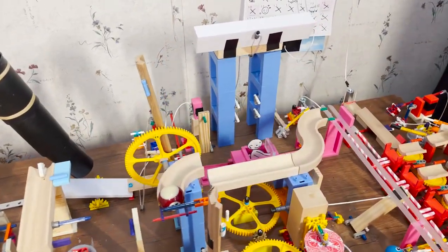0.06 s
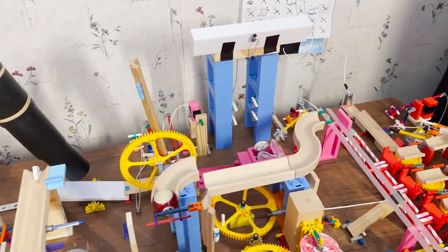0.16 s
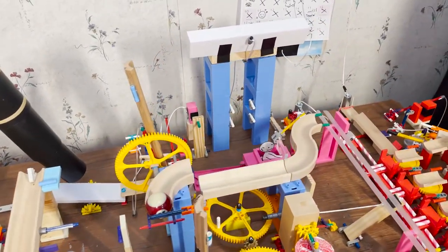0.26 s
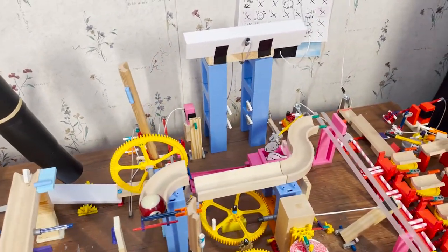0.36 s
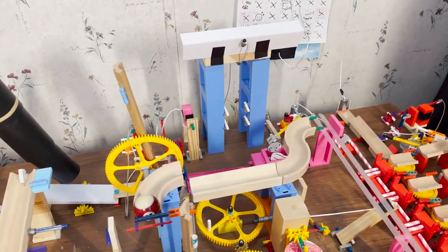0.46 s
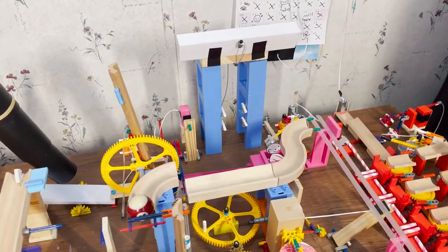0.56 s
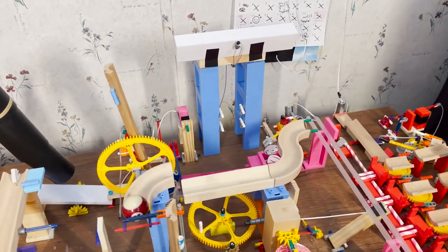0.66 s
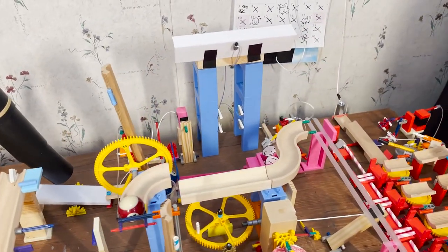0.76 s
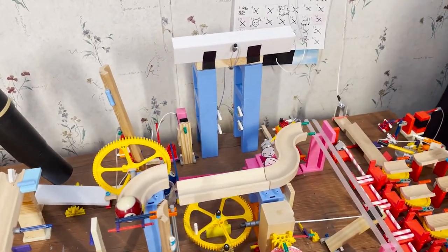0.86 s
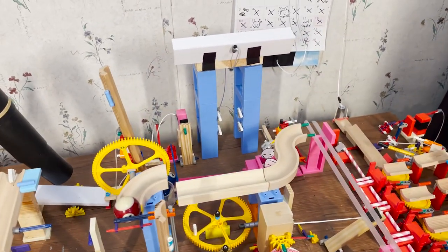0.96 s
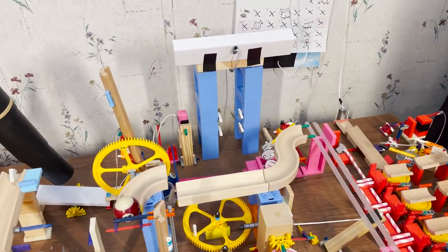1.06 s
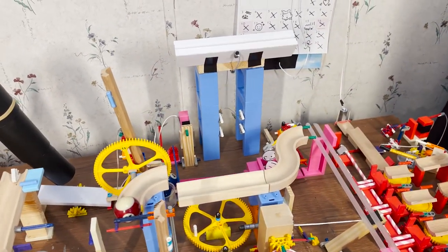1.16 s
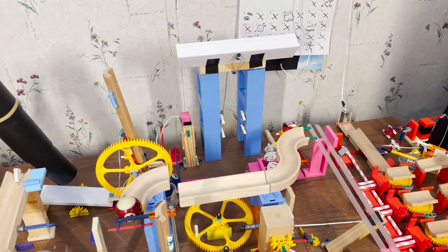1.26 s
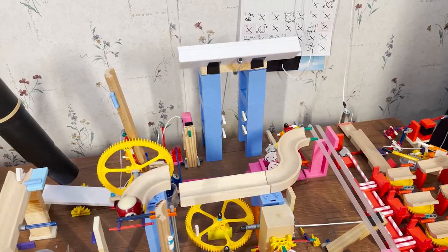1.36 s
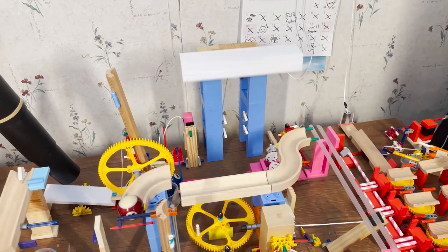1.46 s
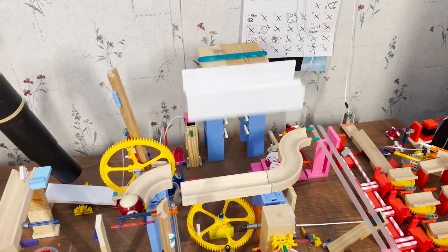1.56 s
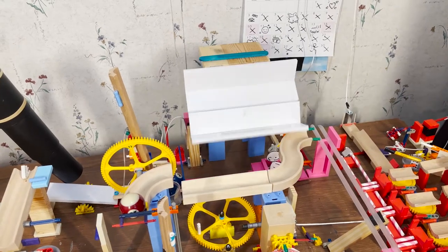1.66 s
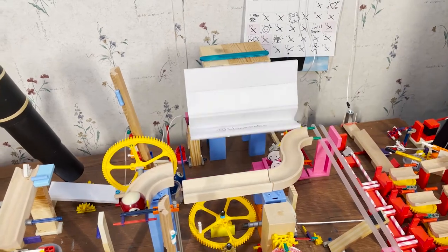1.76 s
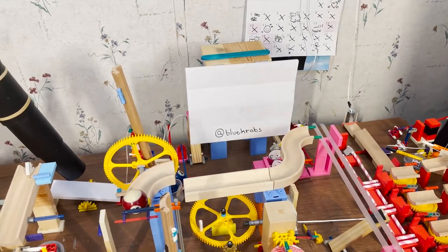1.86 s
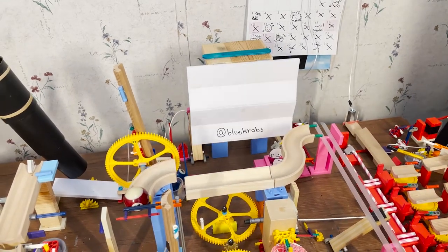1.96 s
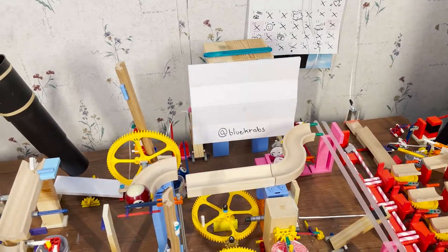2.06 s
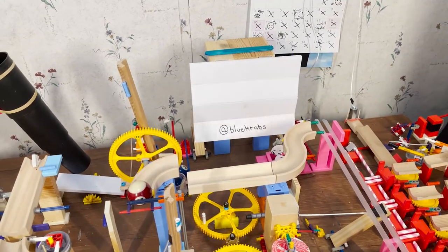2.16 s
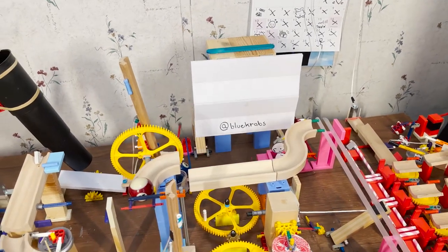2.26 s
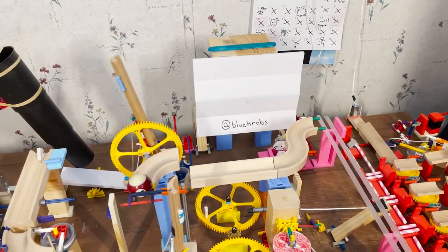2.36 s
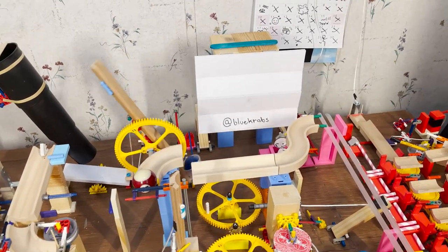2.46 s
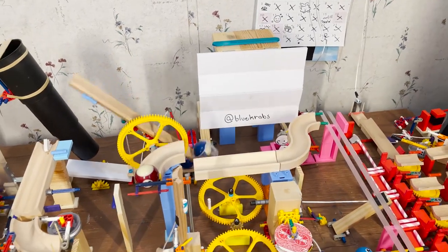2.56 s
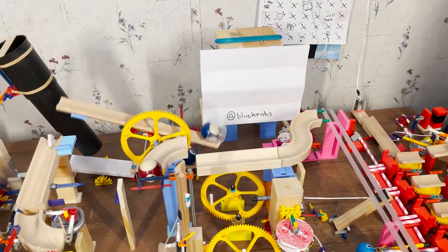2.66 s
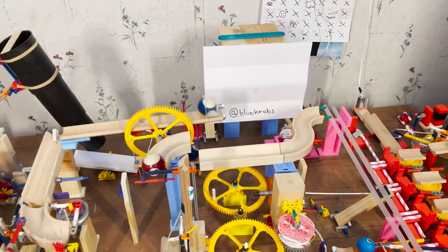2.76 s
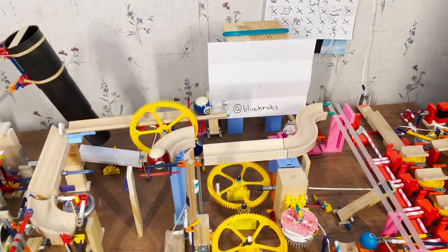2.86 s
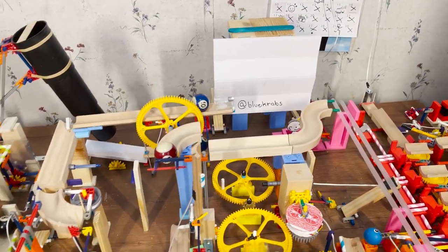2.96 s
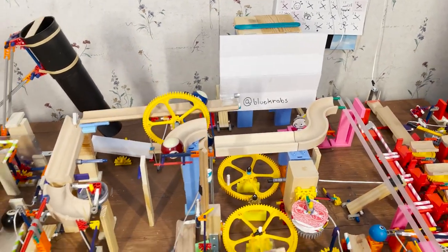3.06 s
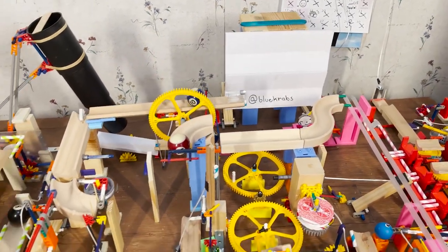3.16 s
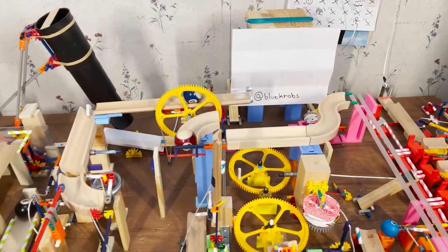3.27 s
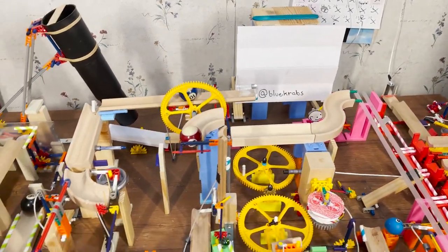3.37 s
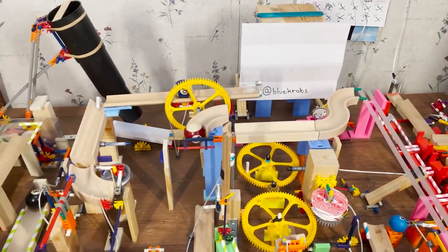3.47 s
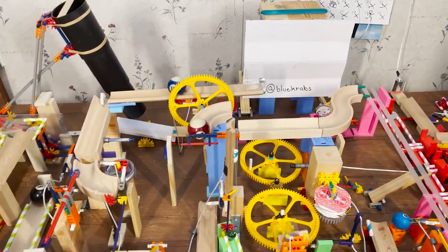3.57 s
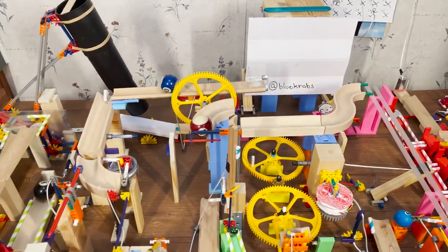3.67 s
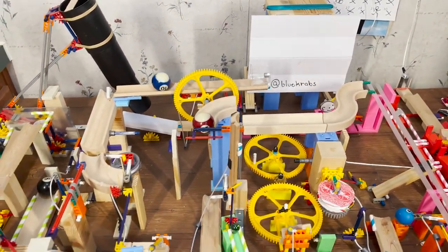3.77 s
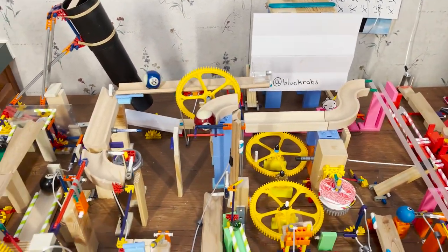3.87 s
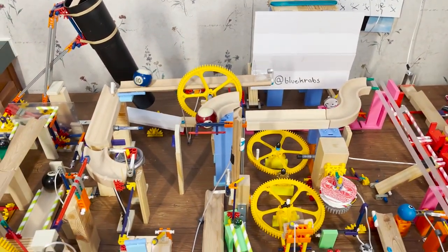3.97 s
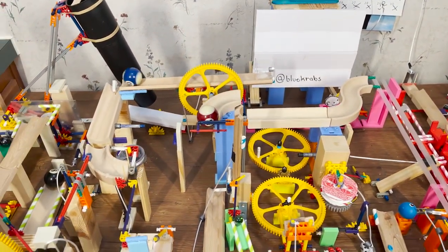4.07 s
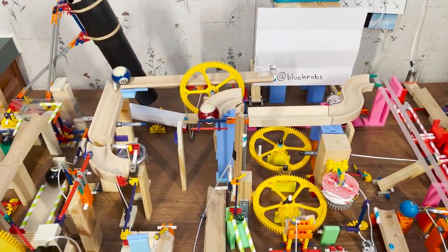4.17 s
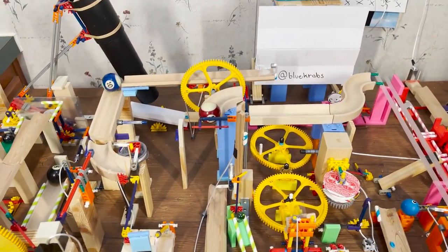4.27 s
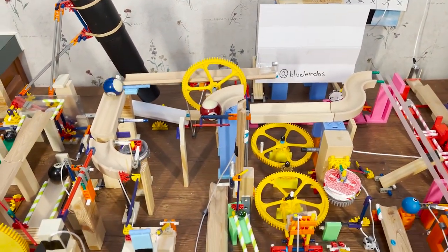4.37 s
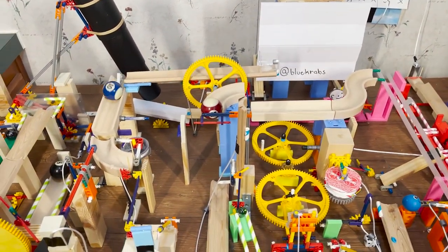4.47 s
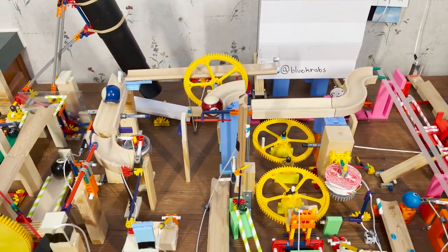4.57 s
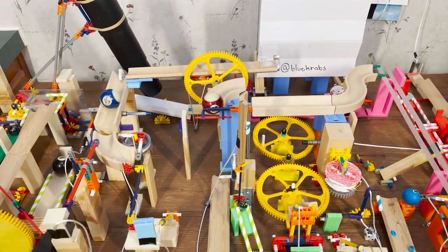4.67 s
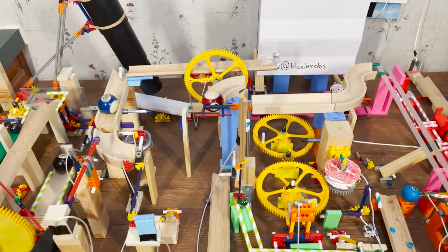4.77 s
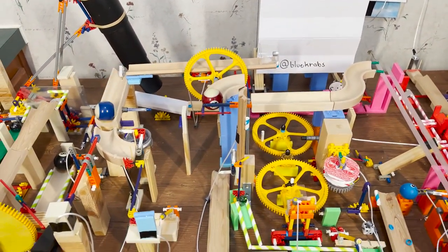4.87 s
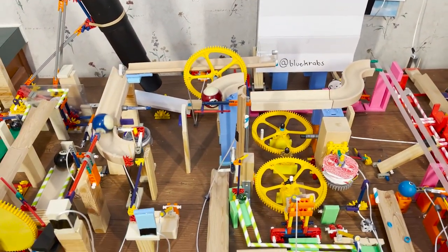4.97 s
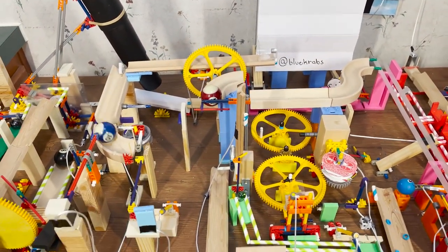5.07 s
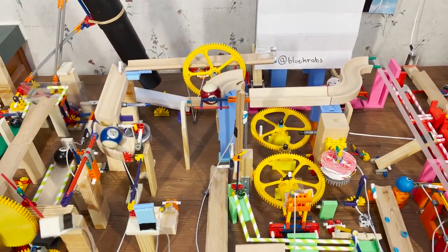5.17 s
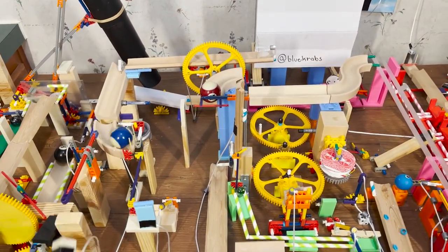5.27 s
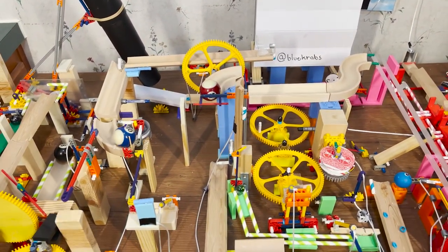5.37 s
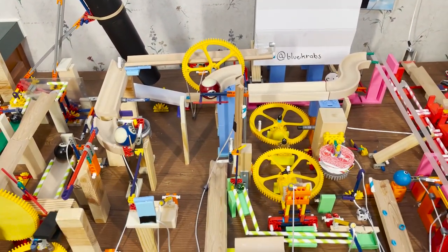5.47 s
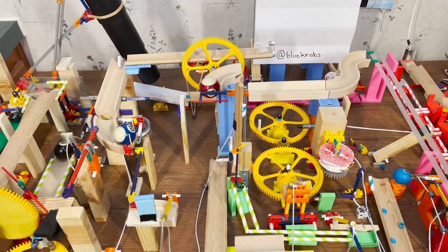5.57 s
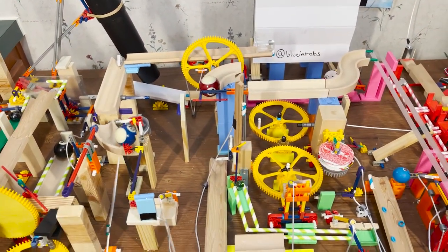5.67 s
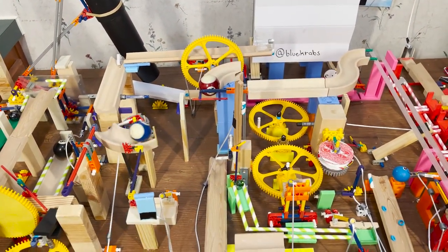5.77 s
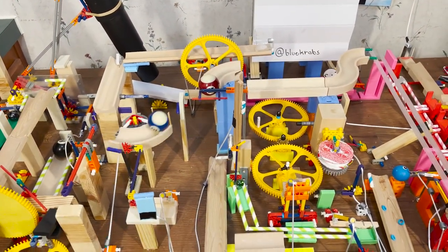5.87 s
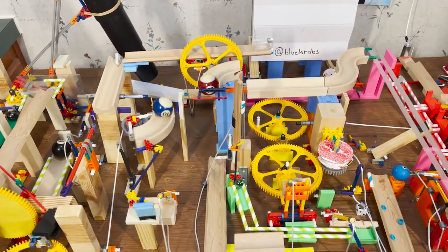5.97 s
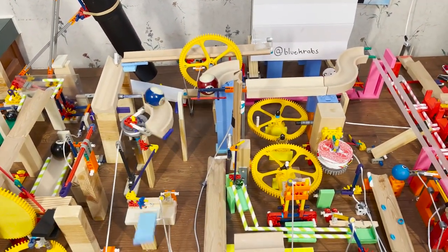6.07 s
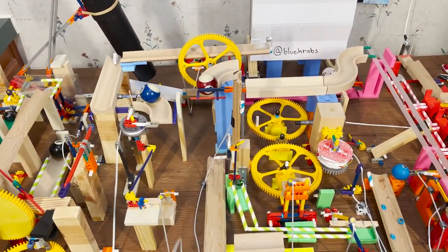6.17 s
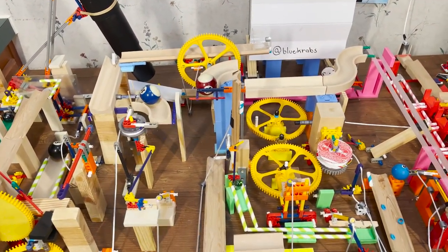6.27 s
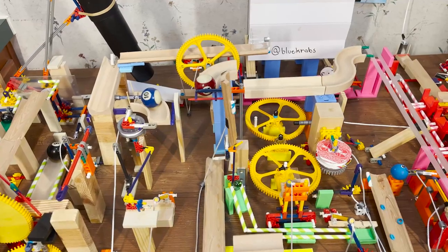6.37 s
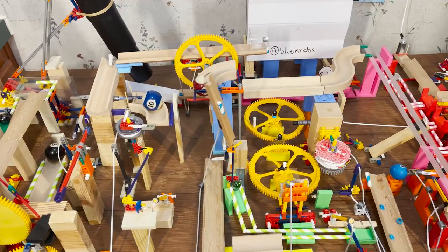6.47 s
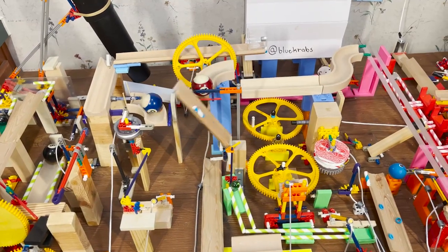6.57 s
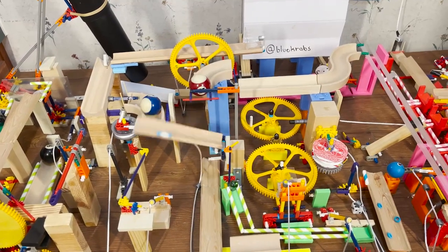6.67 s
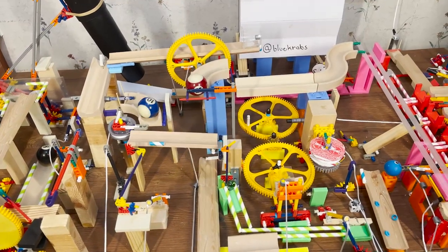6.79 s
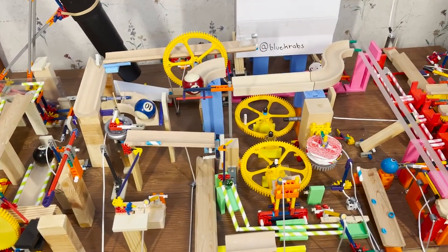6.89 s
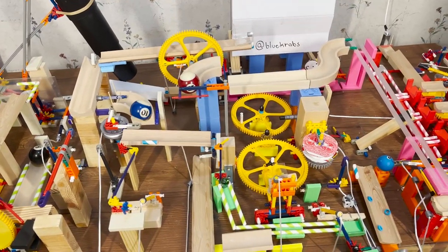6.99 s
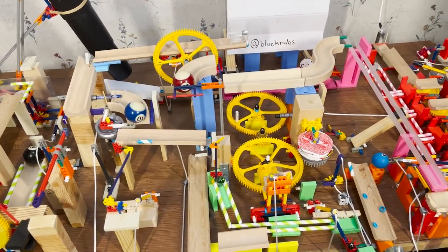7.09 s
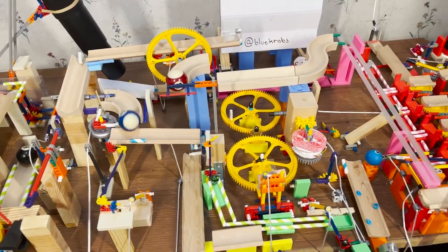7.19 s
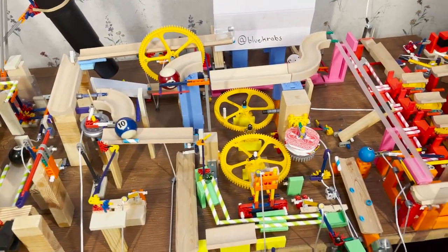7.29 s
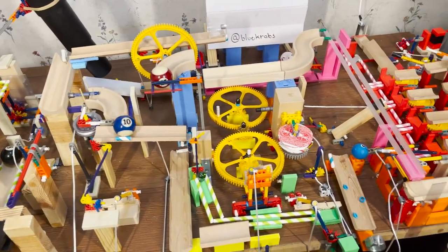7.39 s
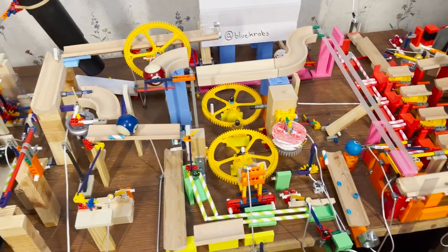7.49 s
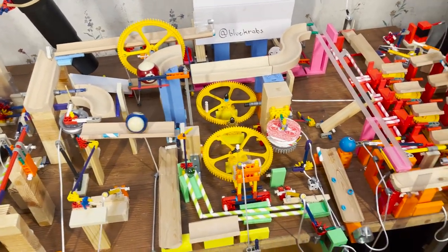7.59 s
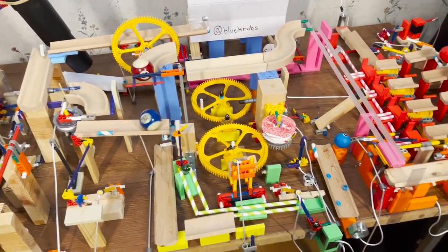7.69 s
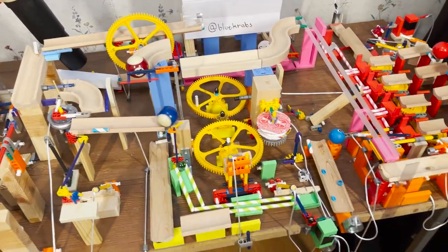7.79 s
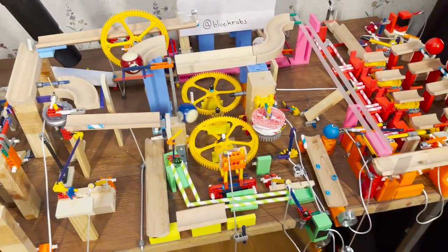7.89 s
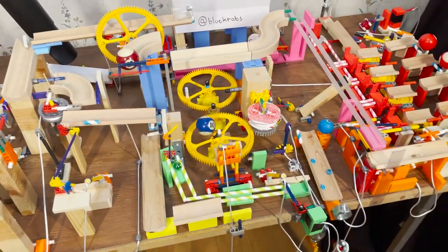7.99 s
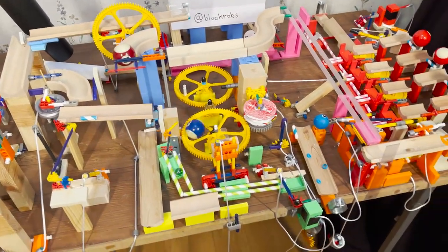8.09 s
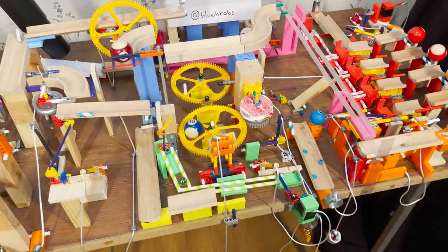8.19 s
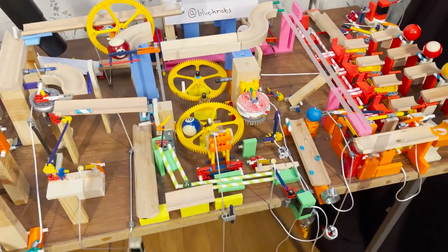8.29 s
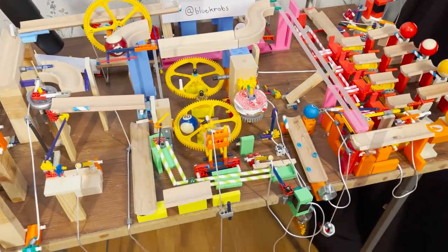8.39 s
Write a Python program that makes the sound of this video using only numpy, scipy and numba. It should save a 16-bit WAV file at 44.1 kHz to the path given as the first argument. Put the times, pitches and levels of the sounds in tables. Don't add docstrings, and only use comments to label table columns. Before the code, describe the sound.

Heavy balls roll along wooden tracks on a tabletop, tripping levers and blocks with sharp clacks, rattles, paper rustle and low thumps.

```python
import sys
import numpy as np
from scipy import signal
from scipy.fft import rfft, irfft, next_fast_len
from scipy.io import wavfile
from scipy.ndimage import uniform_filter1d
from numba import njit

SR = 44100
rng = np.random.default_rng(int(sys.argv[2]) if len(sys.argv) > 2 else 0)


def boost(x):
    u = np.asarray(x, float) / 20
    return 10 ** u


def dump_mix(stems):
    frames = np.atleast_2d(stems).T
    limited = np.clip(frames, -1, 1)
    pcm = np.round(limited * 32767).astype(np.int16)
    wavfile.write(sys.argv[1], SR, pcm)


N = 372204


def band(x, lo_hz, hi_hz):
    y = signal.sosfilt(signal.butter(2, [lo_hz, hi_hz], "band", fs=SR, output="sos"), x)
    return y / np.sqrt(np.mean(y ** 2))


def walk(rate):
    k = int(SR / rate)
    steps = np.repeat(rng.standard_normal(N // k + 1), k)
    return 1.2 * uniform_filter1d(uniform_filter1d(steps, k), k)[:N]


def swell(s, length_s, db, rise_s, t60):
    drive = np.zeros(N + 1)
    np.add.at(drive, np.clip(s * SR, 0, N).astype(int), boost(db) ** 2)
    np.add.at(drive, np.clip((s + length_s) * SR, 0, N).astype(int), -boost(db) ** 2)
    power = np.cumsum(drive[:N])
    fall = np.exp(-2 * np.log(1000) / t60 / SR)
    for pole in np.exp(-1 / (rise_s * SR)), fall:
        power = signal.lfilter([1 - pole], [1, -pole], power)
    return np.maximum(power, 0)


@njit
def ring(place, start, length, swing, turn, fall, places, n):
    out = np.zeros((places, n))
    for k in range(len(start)):
        z, push = swing[k], 1.
        for i in range(start[k], min(n, start[k] + length[k])):
            push *= fall[k]
            z *= turn[k]
            out[place[k], i] += z.imag * (1 - push)
    return out


def strike(s, hz, db, t60, rise, phase, count=3):
    place = np.arange(len(hz))[:, None] % count + 0 * hz.astype(np.int64)
    start = (s * SR).astype(np.int64)
    length = (t60 * SR).astype(np.int64)
    swing = boost(db) * np.exp(2j * np.pi * phase)
    turn = np.exp((2j * np.pi * hz - np.log(1000) / t60) / SR)
    fall = np.exp(-1 / (rise * SR))
    modes = place, start, length, swing, turn, fall
    return ring(*(v.ravel() for v in modes), count, N)


def blows():
    # (time [s], blow level [dB], table thump re blow [dB], hardness [dB]: tick up, clack down)
    clicks = [(0.233, -65.5, -3, -5), (0.316, -80.5, 2, -13), (0.382, -52.5, -13, -3), (0.4, -55.5, -4, -4),
              (0.496, -32.5, -10, -2), (1.029, -52.5, -7, -2), (1.227, -39, -14, 0),
              (1.616, -13, -16, -1.5), (1.848, -23.5, -2.5, -1.5), (1.896, -25.5, -7, 0.5),
              (2.25, -53, -9, -11), (2.73, -38.5, -14.5, 2), (2.893, -39, -8, -0.5),
              (2.977, -54.5, 10.5, -12.5), (3.298, -54, 6.5, 8.5), (4.411, -43, 12, -11),
              (5.073, -35.5, -17, 6), (5.313, -43, -10, -6.5), (5.7, -50.5, 0, -7), (5.909, -45, -14, 3),
              (5.955, -56.5, -10, -4), (6.177, -28, -24.5, 1.5), (6.72, -16, -14, 2.5),
              (7.189, -36.5, -15.5, -1), (7.251, -25, -11, 3.5), (8.066, -33.5, -11, 15),
              (8.333, -51.5, -5.5, -3.5), (8.353, -63.5, -6, -5)]
    clacks = [(1.088, -70, -5, 1), (1.14, -47.5, 9.5, -4.5), (1.859, -20, -25.5, 2.5), (2.256, -49, 0, -4),
              (2.578, -48.5, 9.5, -5.5), (2.592, -48, -4, -7), (2.604, -48.5, 4, -8.5),
              (3.032, -65, 17.5, -10), (3.746, -64, -3.5, 1.5), (4.243, -54, 12, 0),
              (4.29, -25.5, -2, -7.5), (5.273, -53, 1.5, -5), (5.329, -44, -12, -1.5), (5.348, -28, -16, 8),
              (5.364, -34, 1, 6.5), (5.628, -47.5, -4.5, 13), (5.883, -60, -8, 11.5),
              (6.105, -55, -15.5, 0.5), (6.117, -36.5, -12, 5), (6.193, -38.5, -9.5, 0.5),
              (6.713, -27, -13, 5), (7.231, -44, -10.5, -9.5), (7.32, -39, -14, -3.5),
              (7.835, -23, -2, -10), (7.875, -36.5, 2.5, -12.5), (8.122, -34.5, -15.5, 11.5),
              (8.273, -42, -5, -2.5)]
    raps = [(0.935, -55, -5, -3), (0.962, -43, -6, 2.5), (1.12, -65.5, 11.5, 9), (1.499, -70, -7, -3),
            (1.524, -62, 1, 3), (1.565, -36, 2.5, -6), (1.644, -22, -4.5, 2), (2.265, -40.5, 0, -2),
            (2.418, -61, 5, 1), (2.764, -25, -2.5, 3), (2.859, -48, 10.5, -5), (3.34, -69.5, 11.5, -5.5),
            (3.501, -80, 7, -8.5), (4.06, -75, 22.5, -4.5), (4.189, -78, 25.5, -10), (4.971, -40.5, -2, 0),
            (4.982, -42, 3, -1.5), (5.16, -65, 16, -16), (5.675, -45, 1, -0.5), (5.823, -64, 3.5, -0.5),
            (6.019, -57.5, -14, 1), (6.392, -60.5, 6, -5), (7.519, -48, 0, -6), (7.994, -24.5, -9, 10),
            (8.139, -38.5, -12, 7), (8.167, -34, -13, 10)]
    taps = [(0.064, -77.5, 14.5, -2), (0.435, -73.5, -4, -11), (1.821, -28.5, -2, 4.5),
            (2.061, -37, -0.5, -5.5), (2.311, -55.5, 4.5, -4), (2.345, -54.5, -14, 8.5),
            (2.356, -52.5, -3, 6), (2.467, -71, -11, -5), (2.489, -60, 1, 5), (3.27, -78, 21, -7),
            (3.772, -78.5, 9.5, 1.5), (4.314, -44.5, 3, -12.5), (4.777, -81, 27.5, -14.5),
            (4.871, -83.5, 32.5, -15.5), (5.232, -67, 7, -7), (5.395, -36.5, 4, 5.5), (5.552, -64.5, 0, 5),
            (5.575, -61.5, 7, -2), (5.837, -65.5, 7, -12), (7.584, -75, 12, -8.5), (7.75, -71, 8.5, -5.5),
            (7.907, -48, -20, 1), (1.558, -50, 0, -8), (1.817, -46, -8, 4), (5.342, -47, 0, 2),
            (7.828, -55, 5, -8), (7.983, -57, -10, 10), (8.305, -66, -5, 6), (8.315, -62, -5, 6),
            (6.432, -78, -10, 6), (7.173, -76, 15, -10), (5.407, -40, 2, 4), (5.657, -58, 0, 0),
            (2.278, -48, 0, 0), (1.675, -36, -5, 0)]
    bite_db = [7.5, 5.5, -0.5, -3]
    rows = []
    for table, bite in zip((clicks, clacks, raps, taps), bite_db):
        for s, db, thump, hard in table:
            edge = 1.5 * min(hard, 0) - 0.13 * bite
            rows.append((s, db, thump, -bite - hard, 0, edge, hard - bite))
    return np.array(sorted(rows))


def motion(jolt_s=0.031):
    # (time [s], rumble level [dB])
    roll_levels = [(0.0, -74), (0.45, -72), (0.8, -85), (1.2, -71), (1.5, -69.5), (2.4, -67), (3.1, -69),
                   (3.97, -67.5), (4.45, -51.5), (4.9, -53.5), (5.65, -59), (5.92, -80), (6.3, -59),
                   (6.58, -96), (7.3, -75), (7.649, -53), (7.8, -54), (8.44, -73)]
    # (time [s], level [dB])
    sways = [(0.149, -58.5), (0.26, -60.5), (0.505, -53.5), (0.965, -50), (1.15, -42), (1.34, -56),
             (1.62, -33), (1.84, -40.5), (2.07, -51.5), (2.33, -57), (2.765, -52), (3.1, -59.5),
             (3.31, -58), (3.62, -65), (4.1, -60), (4.29, -47.5), (4.5, -60.5), (4.985, -55.5),
             (5.36, -41.5), (5.57, -52), (5.87, -62), (6.129, -50), (6.34, -45.5), (6.72, -51),
             (7.255, -44), (7.529, -58), (7.84, -48.5), (8.01, -50), (8.17, -48.5)]
    # (start [s], end [s], scrape level [dB], hiss re scrape [dB])
    slides = [(0.0, .49, -72, -39), (0.965, 1.124, -71, -5), (1.445, 1.56, -78.5, 2),
              (1.654, 1.99, -54.5, -3.5), (2.06, 2.165, -67.5, -16.5), (2.296, 2.58, -66.5, -4),
              (2.6, 2.74, -62, -14), (3.922, 4.29, -76.5, -1), (4.303, 4.62, -75.5, 6),
              (5.1, 5.33, -88.5, -22.5), (5.44, 5.637, -64, -10), (5.71, 6.337, -77, -5),
              (6.82, 7.0, -64, -6), (7.0, 7.15, -76, -8), (7.3, 7.52, -77.5, -7), (7.556, 7.8, -68, -1),
              (7.907, 7.99, -60, -12.5), (7.978, 8.048, -42.5, -16), (8.063, 8.255, -60, -5),
              (8.261, 8.426, -78, -15)]
    # (shudder level [dB], scrape level [dB], hiss level [dB])
    still_db = [-79, -86, -88]
    roll = boost(np.interp(np.arange(N) / SR, *np.transpose(roll_levels))) ** 2
    s, blow_db, thump_db = blows().T[:3]
    shake = swell(s, jolt_s, blow_db + thump_db - 14, rise_s=0.0028, t60=0.45)
    s, db = np.transpose(sways)
    sway = swell(s, jolt_s, db + 5.5, rise_s=0.015, t60=0.32) + roll * boost(-17.5) ** 2
    s, end_s, scrape_db, hiss_db = np.transpose(slides)
    scrape = swell(s, end_s - s, scrape_db, rise_s=0.01, t60=0.13)
    hiss = swell(s, end_s - s, scrape_db + hiss_db, rise_s=0.01, t60=0.13)
    still = boost(still_db) ** 2
    return np.sqrt([sway + still[0], roll + shake, scrape + still[1], hiss + still[2]])


def rolling(grit_db=3.5):
    # (frequency [Hz], width [Hz], level [dB])
    track = [(125, 30, -14), (176, 16, -1), (232, 40, -12), (278, 45, -15), (390, 110, -15), (490, 60, -20),
             (700, 300, -23)]
    swaying, rumbling, scraping, hissing = motion()
    bumps = rng.standard_normal(N) * boost(walk(25))
    shudder = band(bumps, 32, 40) * boost(-9.5) + band(bumps, 50, 100)
    rumble = np.zeros(N)
    for hz, width, db in track:
        rumble += boost(db + 3.0 * walk(6)) * band(bumps, hz - width / 2, hz + width / 2)
    grit = rng.standard_normal((2, N)) * boost(grit_db * walk(130))
    scrape = band(grit[0], 670, 3500) * scraping * boost(walk(21))
    hiss = band(grit[1], 3100, 12000) * hissing * boost(1.3 * walk(14))
    return boost(-5.0) * (shudder * swaying + rumble * rumbling + scrape + hiss)


def crackle():
    # (time [s], length [s], level [dB])
    crackles = [(0.959, .003, -55), (1.614, .012, -40), (1.71, .05, -58), (1.835, .05, -46),
                (1.858, .006, -37), (1.9, .035, -56), (2.063, .05, -53), (2.34, .055, -55),
                (2.731, .003, -55), (4.982, .004, -50), (5.331, .004, -55), (5.627, .005, -52),
                (6.712, .006, -46), (7.249, .005, -48), (7.834, .012, -50), (7.904, .005, -53),
                (7.993, .016, -39), (8.056, .03, -48), (8.165, .006, -52)]
    s, length_s, db = np.transpose(crackles)
    power = swell(s, length_s, db + 1.0, rise_s=.001, t60=.014)
    return band(rng.standard_normal(N), 14200, 15900) * np.sqrt(power)


def rings(spread=1.4, ring_db=-10):
    # (time [s], level [dB], frequency [Hz], fade by 60 dB [cycles])
    ring_modes = [(4.415, -22, 500, 16), (2.49, -41, 1050, 60), (1.564, -23, 387, 32), (1.614, 4, 2650, 14),
                  (1.822, -18, 1680, 11), (1.86, -2.5, 2250, 7.5), (2.062, -29, 378, 15),
                  (2.265, -32.5, 412, 19), (2.589, -32, 406, 15), (2.766, -7.5, 1034, 20.5),
                  (2.892, -23.5, 1800, 21.5), (3.294, -40, 395, 24), (4.292, -7, 460, 17),
                  (4.291, -5, 3800, 18), (4.98, -10.5, 5870, 13), (5.075, -17, 4240, 19.5),
                  (4.293, -16, 280, 14.5), (5.398, -12, 1400, 20), (5.396, -21, 250, 16),
                  (3.5, -58, 1700, 8), (6.1775, 9, 4700, 9), (6.719, -0.5, 4310, 5.5),
                  (2.768, -13, 202.7, 11.5), (7.2525, -1, 2500, 9), (7.519, -31.5, 846, 16.5),
                  (7.834, -7.5, 1410, 13), (7.835, -6, 2323, 14.5), (7.874, -16, 880, 14),
                  (7.994, -13, 396, 12), (7.994, -4, 8500, 8.5), (6.119, -22, 4680, 30),
                  (6.193, -10, 4400, 16), (5.914, -34, 2200, 16), (4.245, -38, 3800, 20),
                  (2.6, -34, 1200, 16), (2.893, -24, 4300, 16), (7.19, -27, 1870, 8), (7.231, -26, 1170, 8),
                  (7.321, -28, 1360, 10), (8.273, -28, 2000, 10), (8.333, -38, 4500, 25),
                  (5.355, -20, 3500, 16), (1.848, -12, 2810, 10), (2.765, -11, 4300, 10),
                  (4.3, -30, 278, 90), (8.003, -14, 5000, 8), (3.76, -56, 2000, 10), (6.724, -6, 2600, 8),
                  (7.907, -30, 8000, 14), (2.316, -36, 1200, 14)]
    s, db, hz, cycles = np.array(ring_modes).T[:, :, None]
    hz = hz * (1 + spread / cycles * np.linspace(-1, 1, 4))
    phase = .3 * rng.random(hz.shape)
    return strike(s + 0 * hz, hz, db + ring_db + 0 * hz, cycles / hz, 0.62 / hz, phase)


def knocks(count=70, scatter_db=3.5, in_step=0.27, chatter_s=.0035, softening=.2):
    # (frequency [Hz], level [dB], t60 [s])
    table_modes = [(129, -5, 0.081), (184, -2.5, 0.097), (227.5, -8.5, 0.047), (256, -4.5, 0.092),
                   (342, -2, 0.078), (405.2, 0, 0.058), (485.8, -6, 0.082)]
    # (frequency [Hz], t60 [s], level [dB])
    part_colour = [(1000, 0.016, 14), (3180, 0.008, 16), (4300, 0.0082, 16), (8400, 0.0032, 18.5)]
    part_lo_hz, part_hi_hz = 508.2, 12950
    thump_db, thump_rise_s, rise_cycles = 15.5, 0.00046, 0.95
    s, blow_db, thump_rel, *parts_rel = blows().T[:, :, None]
    table_hz, table_db, table_t60 = np.array(table_modes).T
    anchor_hz, anchor_t60, anchor_db = np.array(part_colour).T
    draws = rng.random((len(s), 5, count + len(table_modes)))
    slot, size, damp, late, phase = np.moveaxis(draws, 1, 0)
    part_hz = part_lo_hz * (part_hi_hz / part_lo_hz) ** ((np.arange(count) + slot[:, :count]) / count)
    part_db = [np.interp(np.log(f), np.log(anchor_hz), rel + anchor_db)
               for f, rel in zip(part_hz, np.hstack(parts_rel))]
    hz = np.hstack([part_hz, table_hz * (1 + 0.25 * (slot[:, count:] - .5))])
    db = blow_db + np.hstack([part_db, thump_rel + thump_db + table_db])
    db = db + 2 * scatter_db * (size - .5) - 14.5
    part_t60 = np.interp(np.log(part_hz), np.log(anchor_hz), anchor_t60)
    t60 = np.hstack([part_t60, table_t60 + 0 * s]) * (.5 + damp)
    rise = np.hstack([rise_cycles / part_hz, thump_rise_s + 0 * s * table_hz])
    spread_s = chatter_s * boost(-softening * (blow_db + 13))
    return strike(s + spread_s * late ** 3, hz, db, t60, rise, in_step * phase)


def room(places, onset_s=0.00089):
    # (frequency [Hz], t60 [s], reverberation level [dB], likeness of left and right [0-1])
    room_colour = [(60, 0.12, -4, .45), (250, 0.3, -2.5, 0.9), (600, 0.33, 0, 0.7), (1970, 0.25, 2, .05),
                   (6000, 0.27, 3, .05), (12000, 0.14, 3, 0.3)]
    late_db, late_stretch = -33, 2.4
    t = np.arange(SR // 2) / SR
    hz, *columns = np.transpose(room_colour)
    response = 0
    for f in 30 * 2 ** np.arange(0, 9, 1 / 3):
        t60, db, alike = (np.interp(np.log(f), np.log(hz), c) for c in columns)
        noise = rng.standard_normal((2, 1, len(places), len(t)))
        mid, side = band(noise, f * 2 ** (-1 / 6), f * 2 ** (1 / 6))
        alike = np.clip(alike, 0, 1)
        opposite = side * np.array([1, -1])[:, None, None]
        pair = np.sqrt(1 + alike) * mid + np.sqrt(1 - alike) * opposite
        fade = 10 ** (-3 * t / t60) + boost(late_db) * 10 ** (-3 * t / t60 / late_stretch)
        fade = fade * (1 - np.exp(-t / onset_s))
        response = response + pair * fade * boost(db) * np.sqrt(f / SR / 4 / np.sum(fade ** 2))
    size = next_fast_len(N + len(t))
    return irfft((rfft(places, size) * rfft(response, size)).sum(axis=1), size)[:, :N]


def scene():
    broad = knocks() + rolling() / np.sqrt(3)
    pitched = rings()
    direct = (broad + pitched).sum(axis=0) + crackle()
    echoes = room(broad + boost(-9) * pitched)
    left_lead = 22
    return np.array([boost(2.17) * direct, boost(-5) * np.roll(direct, left_lead)]) + echoes


def gated(x, gate_s=0.008, edge_hz=60):
    # (from [Hz], to [Hz], opening level [dB])
    top_gates = [(12150, 13250, -56), (13250, 17000, -59)]
    size = next_fast_len(N)
    f, spectrum = np.arange(size // 2 + 1) * SR / size, rfft(x, size)
    for lo_hz, hi_hz, open_db in top_gates:
        inside = (np.tanh((f - lo_hz) / edge_hz) - np.tanh((f - hi_hz) / edge_hz)) / 2
        top = irfft(spectrum * inside, size)[:, :N]
        power = uniform_filter1d((top ** 2).mean(axis=0), int(gate_s * SR))
        x = x - top / (1 + (power / boost(open_db) ** 2) ** 4)
    return x


def roll_off(x):
    return signal.sosfilt(signal.butter(12, 16450, fs=SR, output="sos"), x)


def record(dry):
    # (frequency [Hz], level on both sides [dB], extra on the left and
    # less on the right [dB])
    tone_curve = [(19.61, -11.5, -3), (60.4, -2.5, -3), (373, 2, -2.2), (560.8, -4, 3.5), (1202, 0.77, 2.5),
                  (5000, -3.5, 3), (9850, -3, -0.4), (10050, -22, 0.5), (10400, -22, 0), (10754, 7, 0.5),
                  (12750, 3, -21), (13300, -28, -1), (15300, -4.5, -1), (16600, -61, -2)]
    shared_top_hz, top_lag_s, top_turn = 8670, 0.00033, 4.14
    ceiling = .95
    size = next_fast_len(N)
    f = np.arange(size // 2 + 1) * SR / size + 1
    hz, *columns = np.transpose(tone_curve)
    both_db, left_db = (np.interp(np.log(f), np.log(hz), c) for c in columns)
    rounded = np.tanh(0.98 * dry) / 0.84
    left, right = rfft(rounded, size) * boost(both_db + np.array([left_db, -left_db]))
    share = 1 / (1 + (shared_top_hz / f) ** 20)
    copy = left * np.exp(1j * (2 * np.pi * (f - 10000) * top_lag_s - top_turn))
    right = np.sqrt(1 - share) * right + np.sqrt(share) * copy
    heard = gated(irfft(np.array([left, right]), size)[:, :N])
    mix = heard / (1 + (heard / ceiling) ** 6) ** (1 / 6)
    return roll_off(mix)


dry = scene()
out = record(dry)
dump_mix(out)
```